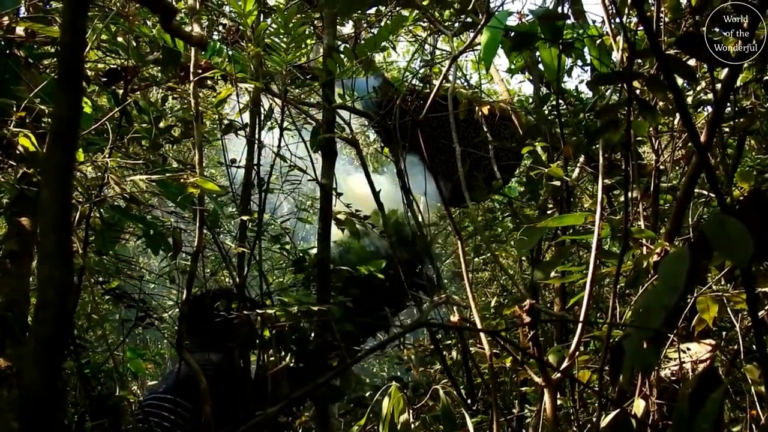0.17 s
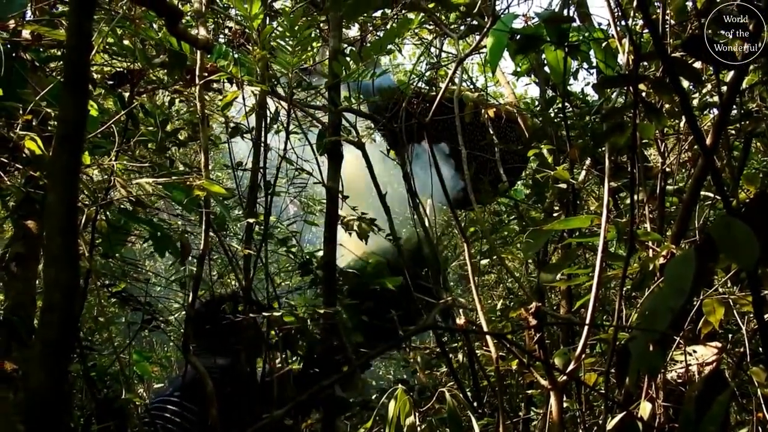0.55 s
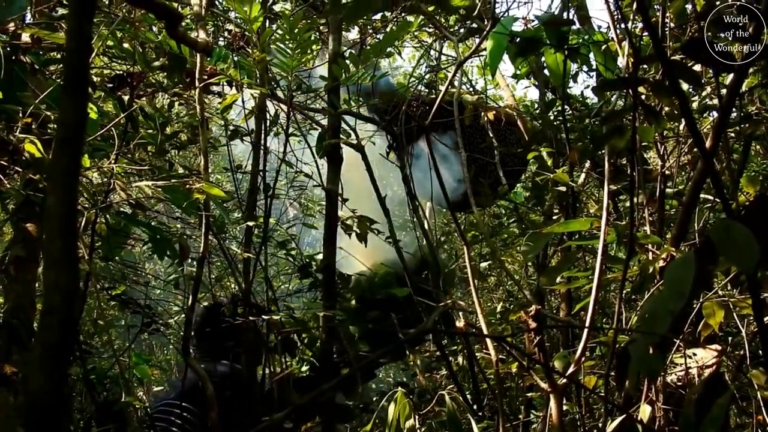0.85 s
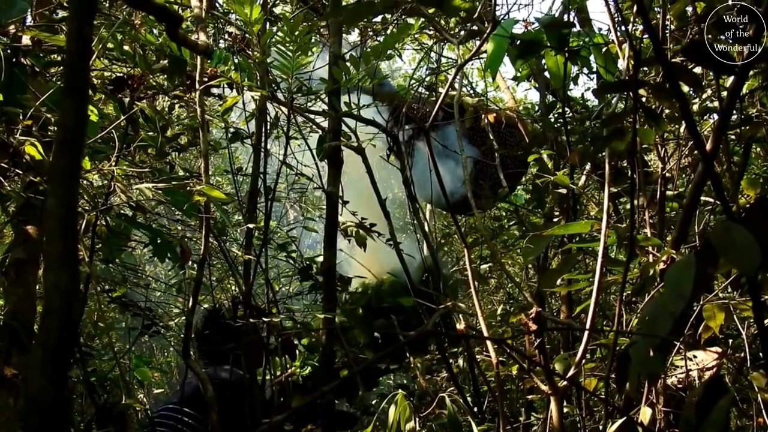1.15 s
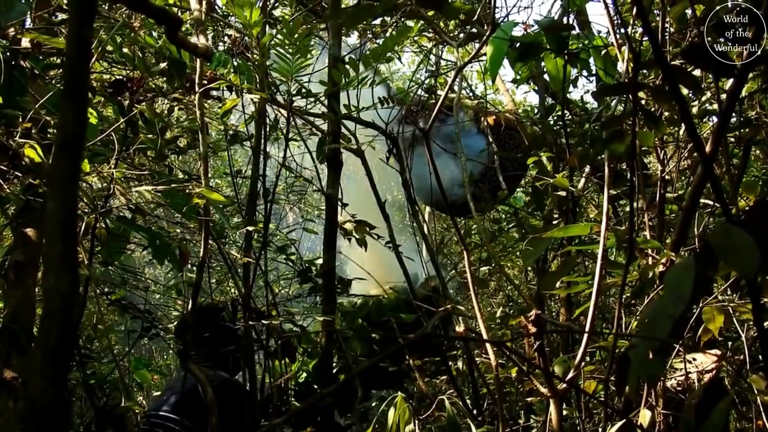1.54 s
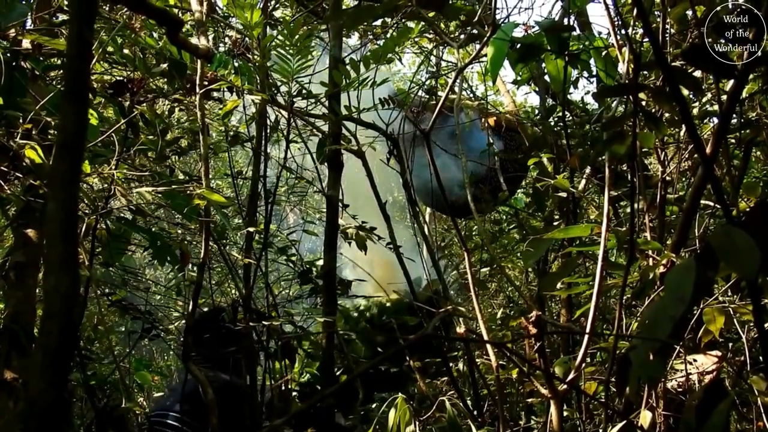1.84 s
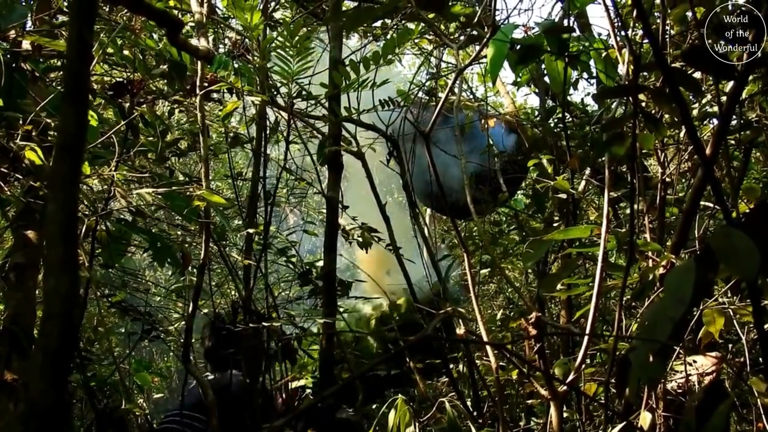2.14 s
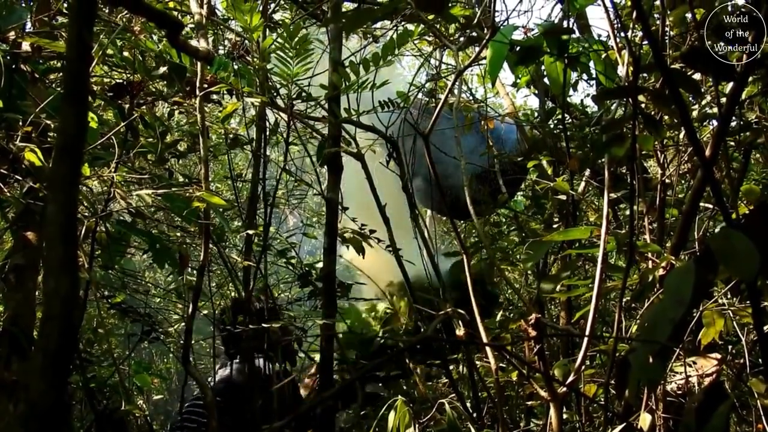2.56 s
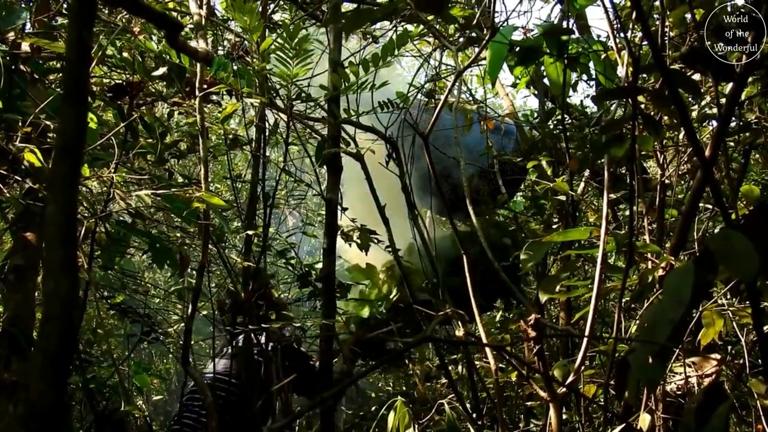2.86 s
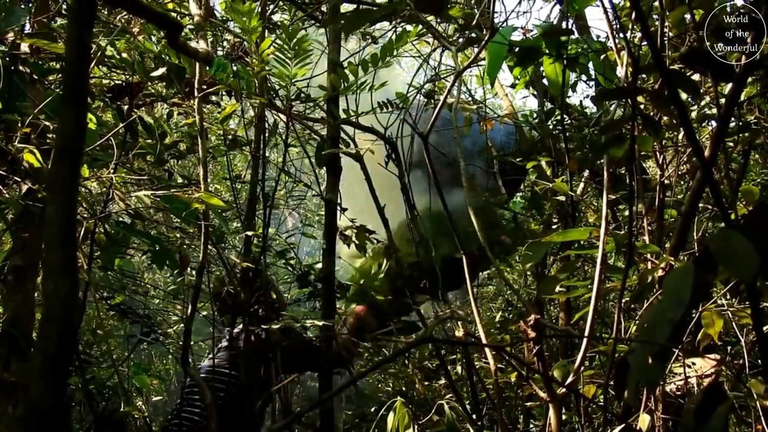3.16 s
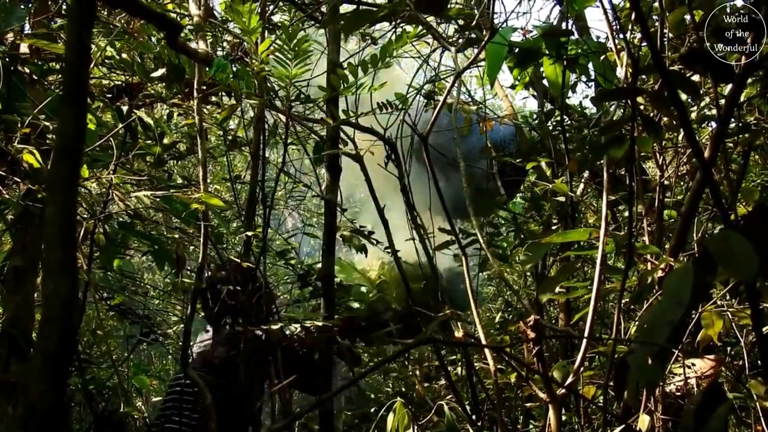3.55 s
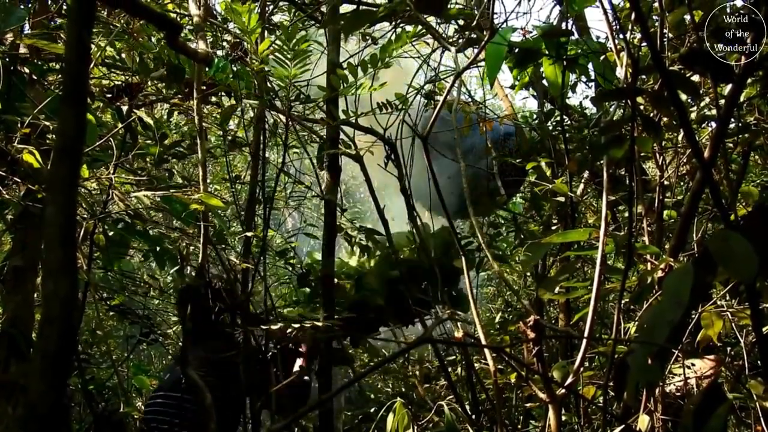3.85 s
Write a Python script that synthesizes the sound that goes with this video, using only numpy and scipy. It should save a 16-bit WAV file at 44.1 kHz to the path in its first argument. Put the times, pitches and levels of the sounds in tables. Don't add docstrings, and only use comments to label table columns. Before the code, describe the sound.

Foliage rustles sharply as it is swung in a forest thicket, with a hard twig snap midway and the strongest swishes last, over wavering bee buzz, canopy hiss and brief early insect trills, heard from a few metres.

```python
import sys
import numpy as np
from scipy import signal
from scipy.fft import rfft, irfft, next_fast_len
from scipy.io import wavfile
from scipy.ndimage import uniform_filter1d

SR = 44100
rng = np.random.default_rng(int(sys.argv[2]) if len(sys.argv) > 2 else 0)


def generate_wav(signal):
    frames = np.transpose(np.atleast_2d(signal))
    scaled = np.clip(frames, -1, 1) * 32767
    pcm = np.round(scaled).astype(np.int16)
    wavfile.write(sys.argv[1], SR, pcm)


def ratio_of_db(decibels):
    return 10 ** (np.asarray(decibels, float) / 20)


N = 176400


def level(x, db):
    return x * ratio_of_db(db) / np.sqrt(np.mean(x ** 2))


def on_log(hz, table):
    a = np.array(table, float)
    return np.interp(np.log(np.maximum(hz, 1)), np.log(np.maximum(a[:, 0], 1)), a[:, 1])


def colour(x, table):
    size = next_fast_len(N + 8192)
    size += size % 2
    log_gain = np.log(ratio_of_db(on_log(np.fft.rfftfreq(size, 1 / SR), table)))
    cepstrum = irfft(log_gain, size)
    cepstrum[1:size // 2] *= 2
    cepstrum[size // 2 + 1:] = 0
    return irfft(rfft(x, size) * np.exp(rfft(cepstrum)), size)[..., :N]


def walk(rate_hz):
    hold = int(SR / rate_hz)
    steps = np.repeat(rng.standard_normal(N // hold + 1), hold)
    return 1.3 * uniform_filter1d(uniform_filter1d(steps, hold), hold)[:N]


# (frequency [Hz], level [dB])
WIDTH = [(30, -21), (60, -16.5), (125, -11.5), (380, -7), (1290, -11.5), (2380, -10), (4400, -6.5),
         (8000, -6.5)]


def stereo(mid, side, db=0):
    side = colour(side, WIDTH) * ratio_of_db(db)
    return np.array([mid + side, mid - side])


def bands(table, lo_hz, count, swell_db, flicker_db, rate_hz):
    hz = np.maximum(np.fft.rfftfreq(N, 1 / SR), 1)
    spec = rfft(rng.standard_normal((2, N))) * ratio_of_db(on_log(hz, table))
    out = 0
    for k in range(count):
        lowest = -1 if k else 0
        highest = 1 if k < count - 1 else 0
        away = np.clip(2 * np.log2(hz / lo_hz) - k, lowest, highest)
        band = irfft(spec * np.cos(np.pi / 2 * away) ** 2, N)
        out = out + band * ratio_of_db(swell_db + flicker_db * walk(rate_hz))
    return out


# (frequency [Hz], density [dB per Hz])
RUMBLE = [(15, -70), (32, -33), (45, -17), (64, 3), (85, -7.5), (160, -9), (300, -23.5), (500, -59.5)]
# (frequency [Hz], density [dB per Hz])
CANOPY = [(150, -10), (280, -12), (1000, -10), (1400, -15), (7100, -9.5), (9200, -25), (11500, -31.5),
          (15500, -46)]
# (time [s], level [dB])
BREEZE = [(0, 7), (.5, 5.5), (1, 2.5), (1.5, 1.5), (2, 2.5), (2.5, 5.5), (3, 5.5), (3.5, 7.5), (4, -0.5)]
# (time [s], level [dB])
GUST = [(0, -1), (.15, 0.5), (.5, 0), (1.2, 2), (1.7, -5.5), (2.05, 4.5), (2.7, 3.5), (2.9, -1.5),
        (3.5, -1.5), (3.9, -1), (4, -5)]


def background(t):
    low = bands(RUMBLE, 45, count=5, swell_db=0, flicker_db=1.3, rate_hz=3.85)
    low = level(low, -35)
    upper = signal.sosfiltfilt(signal.butter(3, 85, "highpass", fs=SR, output="sos"), low)
    low = low + upper * (ratio_of_db(np.interp(t, *np.array(GUST).T)) - 1)
    swell_db = np.interp(t, *np.array(BREEZE).T) + 0.5 * walk(3.9)
    hiss = bands(CANOPY, 327, count=11, swell_db=swell_db, flicker_db=1.0, rate_hz=8.17)
    return stereo(*(low + level(hiss, -43.5)))


BEE_OVERTONES = [-12, -15.5]
# (frequency [Hz], density [dB per Hz])
WASH = [(150, -14), (260, -6), (500, 6.5), (750, -10), (1000, 4.5), (1250, -10), (3000, -37)]
# (time [s], rms level [dB])
SWARM = [(0.0, -45.5), (0.56, -54), (0.8, -38), (1.0, -48.5), (1.09, -40.5), (1.41, -59.5), (1.9, -43),
         (1.98, -54), (2.75, -42), (2.88, -60.5), (3.21, -36), (4.0, -50)]


def bees(t, count=12):
    wing_hz, spread, wander = 360, 0.05, 0.03
    out = np.zeros((2, N))
    for off, pan in rng.standard_normal((count, 2)):
        bee_hz = wing_hz * (1 + spread * off + wander * walk(30))
        phase = 2 * np.pi * np.cumsum(bee_hz) / SR
        tone = np.sin(phase)
        for harmonic, db in enumerate(BEE_OVERTONES, start=2):
            tone = tone + ratio_of_db(db) * np.sin(harmonic * phase)
        out += tone * ratio_of_db(2.8 * walk(8)) * ratio_of_db(0.41 * pan * np.array([[1], [-1]]))
    wash = colour(rng.standard_normal((2, N)), WASH)
    wash = stereo(*level(wash, -3.5))
    trim_db = -6.5
    return (level(out, 0) + wash) * ratio_of_db(np.interp(t, *np.array(SWARM).T) + trim_db)


# (pitch [Hz], wobble [Hz], rms level [dB], fade start [s], fade [dB/s])
TRILLS = [
    (5340, 45, -51, .4, 35),
    (4470, 30, -60, .5, 45),
    (5760, 50, -60, .55, 60),
]


def trills(t):
    out = 0
    for pitch_hz, wobble_hz, db, fade_start_s, fade_db_s in TRILLS:
        hz = pitch_hz + wobble_hz * np.array([walk(150), walk(150)])
        tone = np.sin(2 * np.pi * np.cumsum(hz, axis=1) / SR)
        fade_db = fade_db_s * np.maximum(t - fade_start_s, 0)
        out = out + tone * ratio_of_db(db + 3 + 1.8 * walk(60) - fade_db)
    return stereo(*out)


def crackle(per_s, table):
    spread_db, biggest, grain_s = 2.15, 3.5, 0.0008
    size = ratio_of_db(spread_db * np.minimum(rng.exponential(size=N), biggest))
    size = (rng.random(N) < per_s / SR) * size
    burst = signal.lfilter([1], [1, -np.exp(-1 / (grain_s * SR))], size ** 2) ** .5
    return level(colour(burst * rng.standard_normal((2, N)), table), 0)


# (frequency [Hz], density [dB per Hz])
LEAVES = [(300, -23), (1200, -16.5), (2600, -12), (4500, -4.5), (7200, 0), (8600, -12.5), (10500, -26),
          (15500, -53)]
# (frequency [Hz], density [dB per Hz])
STEMS = [(150, -9), (350, 1.5), (1000, -3.5), (2200, -2), (3500, -23), (6000, -33), (15500, -87)]
# (peak time [s], rms level [dB], rise [dB/s], fall [dB/s], stems re leaves [dB])
SWISHES = [(1.888, -25.5, 178, 127, -20), (2.15, -43, 8.5, 8, -5.5), (2.66, -34.5, 148, 60, -22),
           (2.88, -40, 12, 34, -11), (3.06, -30, 98, 70, -20), (3.2, -39.5, 82, 56, -25),
           (3.403, -26.5, 160, 56, -17.5), (3.5, -41.5, 43.5, 38, -3.5), (3.623, -15.5, 141, 228, -21),
           (3.77, -31, 29, 27, -22), (3.918, -16, 125, 112, -18.5)]


def swishes(t):
    grains_per_s, round_s, flutter_db = 6000, 0.03, 1.62
    leaf_power, stem_power = np.zeros(N), np.zeros(N)
    for peak_s, db, rise_db_s, fall_db_s, stems_db in SWISHES:
        drop_db = np.where(t < peak_s, rise_db_s * (peak_s - t), fall_db_s * (t - peak_s))
        power = ratio_of_db(db - drop_db) ** 2
        leaf_power += power
        stem_power += power * ratio_of_db(stems_db) ** 2
    leaves, stems = uniform_filter1d(np.array([leaf_power, stem_power]), int(round_s * SR)) ** .5
    sound = leaves * crackle(grains_per_s, LEAVES) + stems * crackle(grains_per_s, STEMS)
    return stereo(*(sound * ratio_of_db(flutter_db * walk(60))), db=-2.0)


# (time [s], knock peak [dB], tick [dB], tilt [dB per octave])
SNAPS = [
    (2.3407, -7.5, -11, 0),
    (2.4494, -14, -20, .5),
    (2.7173, -21, -23, 0),
    (3.4504, -17, -40, -1),
]
SHAKES = [-21.5, -25.5, -30.5, -40]
# (frequency [Hz], level [dB], t60 [s])
TWIG = [(600, -16, .012), (1020, -7, .011), (1450, -9, .005), (1850, 0, .004), (2700, -7, .006),
        (3650, -7, .008)]


def snaps(t):
    break_s, tick_hz, tick_t60_s = 0.00018, 6800, 0.012
    shake_t60_s, first_t60_s, first_db = 0.19, 0.17, -6
    twig, shake = np.zeros(N), np.zeros(N)
    chance_db = rng.standard_normal((len(SNAPS), len(TWIG)))
    for (snap_s, knock_db, tick_db, tilt_db), leaves_db, vary_db in zip(SNAPS, SHAKES, chance_db):
        age = np.maximum(t - snap_s, 0)

        def fade(t60_s):
            return ratio_of_db(-60 * np.minimum(age / t60_s, 5))

        onset = 1 - np.exp(-(age / break_s) ** 2)
        ring = np.zeros(N)
        for (hz, db, t60_s), vary in zip(TWIG, vary_db):
            gain = ratio_of_db(db + tilt_db * np.log2(hz / 1500) + vary)
            ring -= onset * gain * np.sin(2 * np.pi * hz * age) * fade(t60_s)
        tick = onset * np.sin(2 * np.pi * tick_hz * age) * fade(tick_t60_s)
        twig += ratio_of_db(knock_db) * ring / np.abs(ring).max() + ratio_of_db(tick_db) * tick
        shake += onset * ratio_of_db(leaves_db) * (fade(shake_t60_s) + ratio_of_db(first_db) * fade(first_t60_s))
    mid, side = shake * crackle(2500, LEAVES)
    return stereo(mid, side) + twig * ratio_of_db(np.array([[.4], [-.4]]))


# (frequency [Hz], in-phase share of patches [0-1], opposite-phase share [0-1])
JOINED = [(6500, 0, 0), (7000, .75, .03), (8600, .72, .08), (9000, .5, .33), (11000, .25, .5),
          (15000, .15, .72)]


def join_treble(x):
    patch_hz, patch_s, shared, free_s = 690, 0.046, 0.5, 0.05
    hz, s, z = signal.stft(x, SR, nperseg=1024)
    row, column = (hz / patch_hz).astype(int), (s / patch_s).astype(int)
    own, common = rng.random((2, 40, column.max() + 1))
    agrees = common[1:2] + own * .5 < shared + .25
    chance = np.where(agrees, common[:1], rng.random(own.shape))[row][:, column]
    table_hz, *shares = np.array(JOINED).T
    same, opposite = (np.interp((row + .5) * patch_hz, table_hz, p)[:, None] for p in shares)
    right = np.where(chance > 1 - opposite, -z[0], z[1])
    right = np.where(chance < same, z[0], right)
    for snap_s in np.array(SNAPS)[:2, 0]:
        right = np.where(np.abs(s - snap_s - free_s / 2) < free_s, z[1], right)
    return signal.istft(np.array([z[0], right]), SR, nperseg=1024)[1][:, :N]


def scene():
    t = np.arange(N) / SR
    return background(t) + bees(t) + trills(t) + swishes(t) + snaps(t)


def roll_off(x):
    return signal.sosfilt(signal.butter(12, 15630, fs=SR, output="sos"), x)


def record(dry):
    split_hz, late_s = 4200, 0.0105
    hz = np.fft.rfftfreq(N, 1 / SR)
    high = irfft(rfft(dry) * np.clip((hz - split_hz) / 120 + .5, 0, 1), N)
    lag = int(late_s * SR)
    late_high = np.concatenate([high[:, lag:0:-1], high[:, :-lag]], axis=1)
    return roll_off(join_treble(dry - high + late_high))


dry = scene()
out = record(dry)
generate_wav(out)
```